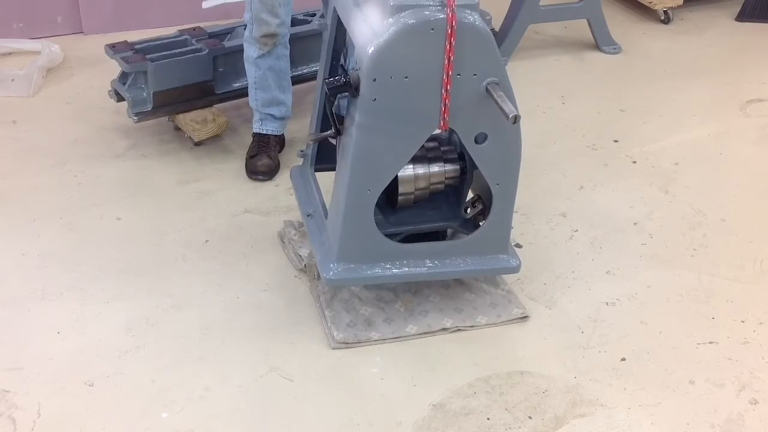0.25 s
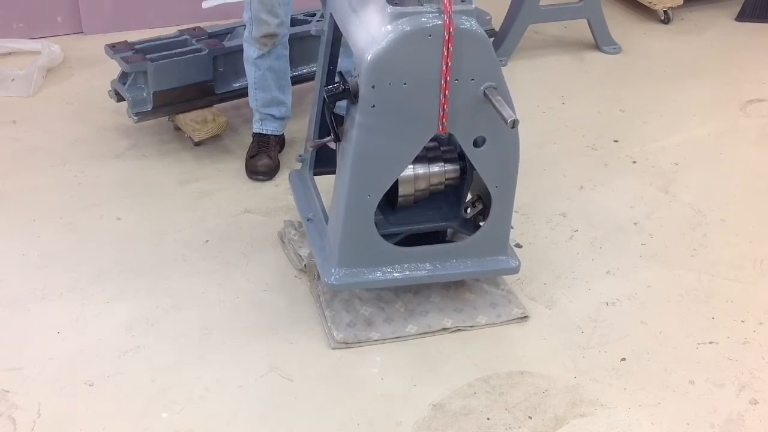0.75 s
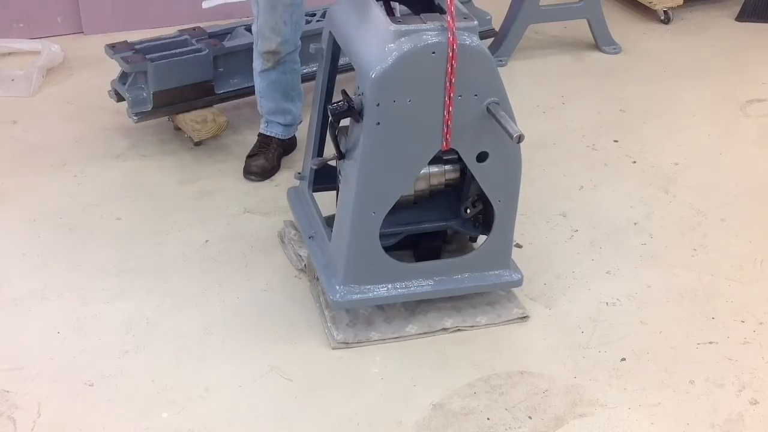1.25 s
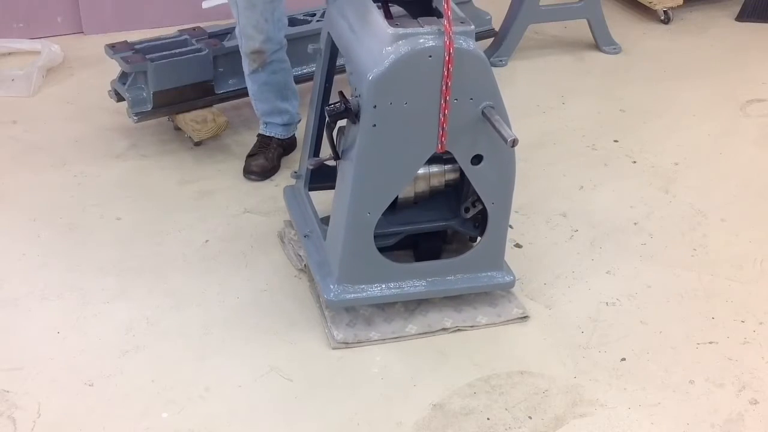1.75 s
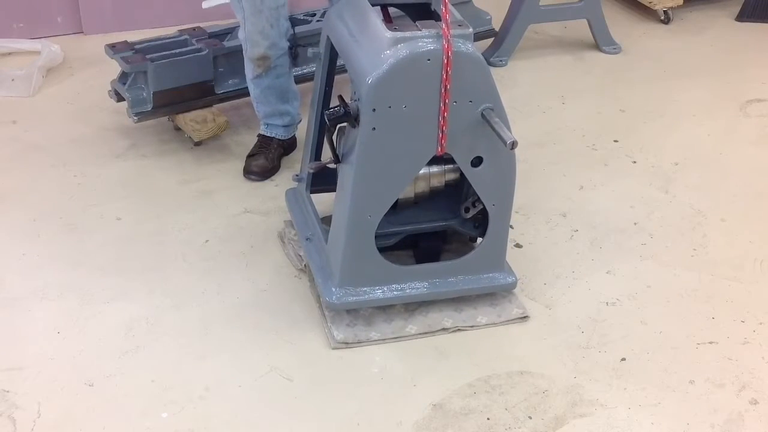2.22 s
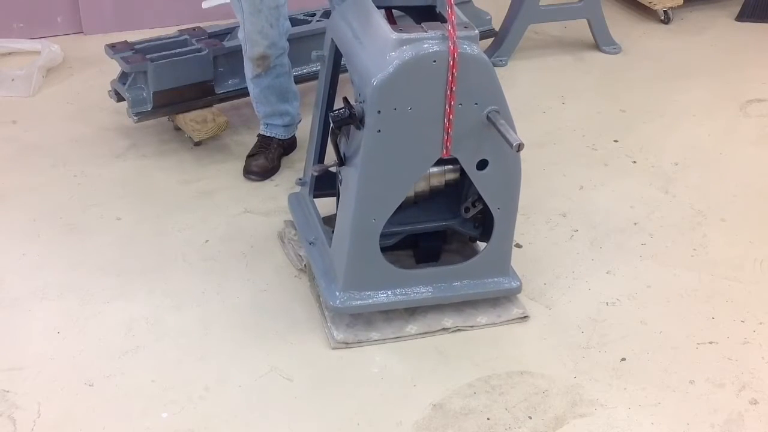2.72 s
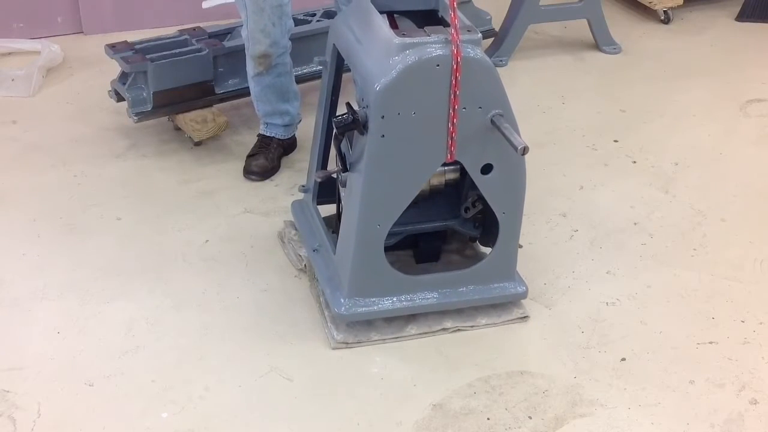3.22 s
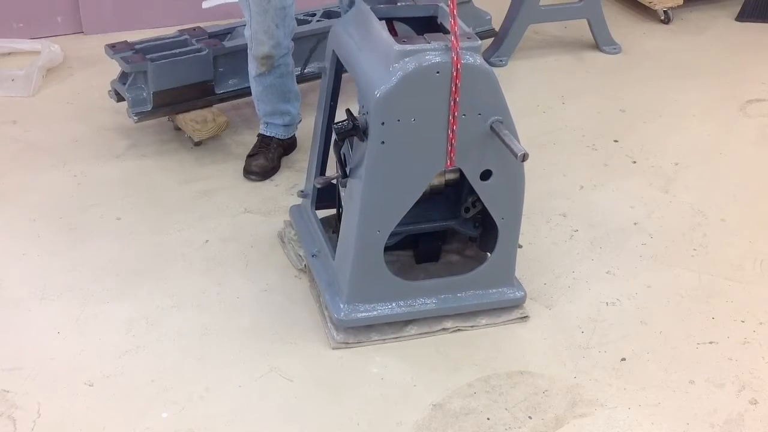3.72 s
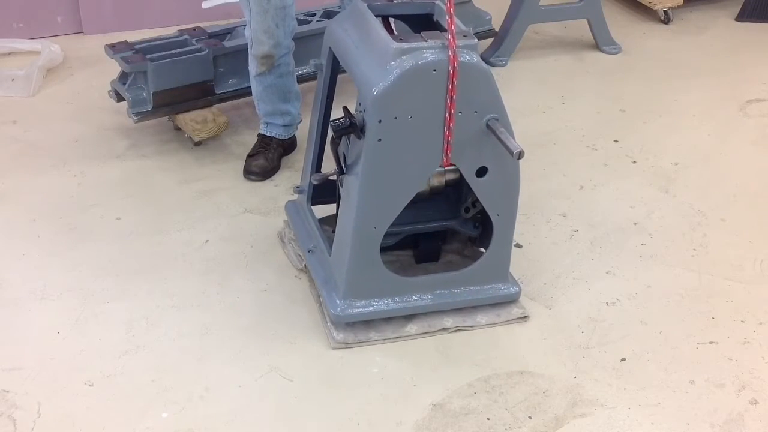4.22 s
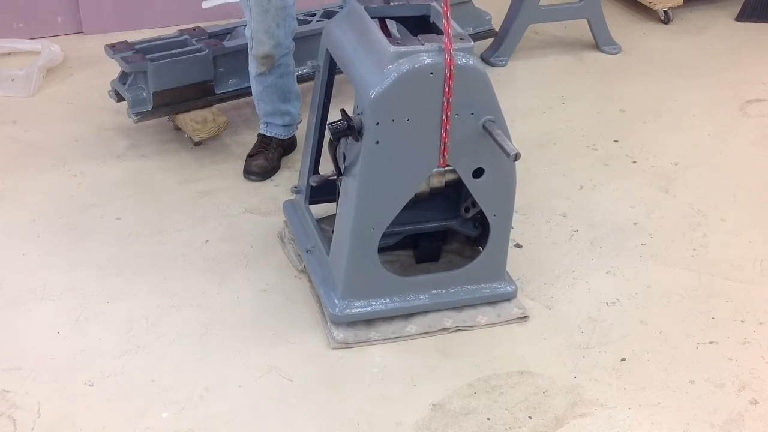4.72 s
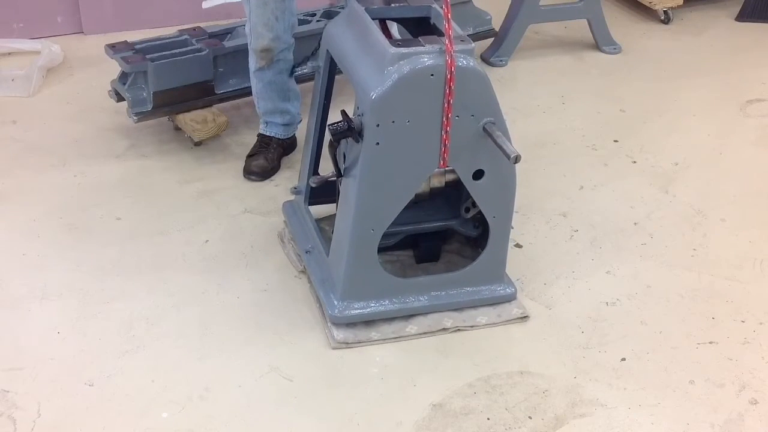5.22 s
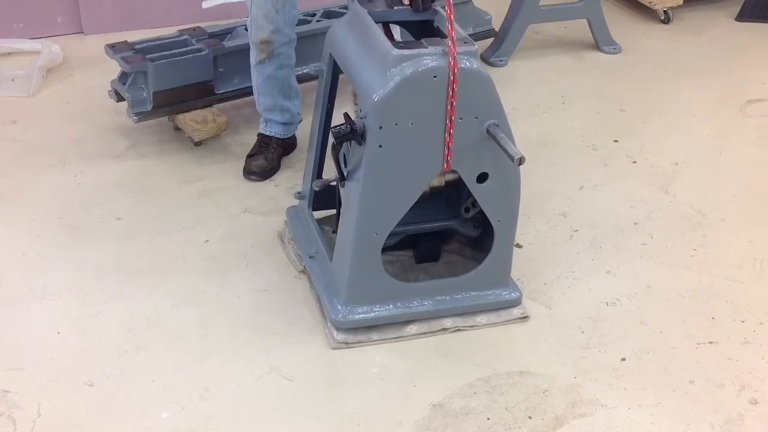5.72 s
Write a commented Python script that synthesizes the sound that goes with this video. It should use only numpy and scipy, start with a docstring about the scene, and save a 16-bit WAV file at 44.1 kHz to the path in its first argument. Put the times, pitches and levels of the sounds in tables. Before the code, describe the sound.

A fading low hum and small bright chain ticks open over quiet workshop air. At about 0.17 s the first haul swells into a loud, dense clatter of steel links, with a hollow wheel tone near 950 Hz, and lets go around 0.75 s. Its echo fades, then the level dips abruptly to near silence at 1.1-1.28 s. Jerks start the second haul at 1.3 s; a heavy clang strikes at 1.8 s, and clonks slow down until 2.25 s while steel rings on. Slack chain swishes and ticks at 2.15-2.9 s. The third haul rattles from 3.04 to 3.75 s, ending in a clonk and echo, with a light ping at 4.17 s. Strong jerks open the fourth, slightly duller haul at 4.3 s; another clang hits at 4.74 s, then a clonk at 4.87 s. Ringing decays under faint slack-chain hiss, scattered ticks and a high ping near 5.6 s, to 6 s.

```python
"""A fading low hum and the first ticks of a slack chain are heard, then four hauls on a hand chain hoist
that lowers a cast-iron machine frame in a hard-walled workshop. Each haul is a dense random series of
steel link contacts that excites the resonances of the hand wheel and its housing. Near the end of two
hauls a heavy clang sets steel modes ringing, and diffuse echo draws out the metal sounds."""
import sys
import numpy as np
from scipy import signal
from scipy.fft import rfft, irfft, next_fast_len
from scipy.io import wavfile
from scipy.ndimage import map_coordinates

SR = 44100
rng = np.random.default_rng(int(sys.argv[2]) if len(sys.argv) > 2 else 0)


def digitize_waveform(pressure):
    """Quantize a signal to 16-bit integers and store it at the path in sys.argv[1].

    Rows of a 2-D input are taken as channels; values are limited to [-1, 1].
    """
    field = np.atleast_2d(pressure).T
    bounded = np.clip(field, -1, 1)
    quanta = np.round(bounded * 32767).astype(np.int16)
    wavfile.write(sys.argv[1], SR, quanta)


N = 262835

# clangs as the loaded chain settles: t/s, level/dB before the crash and ring offsets, hum level/dB
CLANG_EVENTS = [(1.801, -16, -39), (2.493, -44, -80), (4.736, -15, -40.5)]
TOP_HZ = 15350  # upper limit of the sound's band


def amp(db):
    """Level to amplitude: 20 dB is a factor of ten."""
    return 10 ** (np.asarray(db) / 20)


def unit(x):
    """Normalization to rms 1, so that levels can be set afterwards."""
    return x / np.sqrt(np.mean(x ** 2) + 1e-20)


def along(points, hz):
    """Spectral interpolation of (f/Hz, value) points on a logarithmic frequency axis."""
    f, value = np.transpose(points)
    return np.interp(np.log(hz + 1), np.log(f + 1), value)


def add(track, s, sound):
    """Superposition: mix a sound into a track from time s."""
    start = max(0, round(s * SR))
    track[start:start + len(sound)] += sound[:N - start]


def filtered(x, gain):
    """Zero-phase filtering: each frequency is weighted by a real gain."""
    size = next_fast_len(N + SR // 2)
    return irfft(rfft(x, size) * gain(np.fft.rfftfreq(size, 1 / SR)), size)[:N]


def struck(x, gain, size=32768):
    """Causality by minimum phase: a body rings only after it is hit."""
    log_gain = np.log(np.maximum(gain(np.fft.rfftfreq(size, 1 / SR)), 1e-6))
    cepstrum = irfft(log_gain)
    # folding the cepstrum onto positive time gives the minimum phase
    cepstrum[1:size // 2] *= 2
    cepstrum[size // 2 + 1:] = 0
    impulse_response = irfft(np.exp(rfft(cepstrum)))
    return signal.fftconvolve(x, impulse_response)[:N]


def burst(t60):
    """Exponentially decaying noise: a cluster of contacts with the energy of 10 ms at rms 1."""
    t = np.arange(SR // 2) / SR
    noise = rng.standard_normal(len(t)) * amp(-60 * t / t60)
    return noise / np.linalg.norm(noise) * np.sqrt(SR / 10 / 10)


def hall(x, direct_db, count=6):
    """Diffuse reverberation, decaying fastest in the treble; the moving chain changes its echo path."""
    # the workshop's echo: f/Hz, t60/s
    decay_times = [(100, 0.56), (500, 1.11), (1500, 1.17), (3000, 0.85), (5000, 0.67), (8000, 0.43),
                   (14000, 0.23)]
    hz, t, noise = signal.stft(rng.standard_normal((count, 3 * SR // 2)), SR, nperseg=256)
    t60 = along(decay_times, hz)[:, None]
    tails = signal.istft(noise * amp(-60 * t / t60) / np.sqrt(t60), SR, nperseg=256)[1]
    tails /= np.linalg.norm(tails[0])
    # every 256 samples the sound passes to the next tail in turn
    path = np.arange(N) // 256 % count == np.arange(count)[:, None]
    wet = signal.fftconvolve(x * path, tails, axes=1)[:, :N].sum(0)
    return (amp(direct_db) * x + wet) / np.hypot(1, amp(direct_db))


def links(rattle_db, most_per_s, scatter_db, ring_t60, ring_db, count=4000):
    """Shot noise of steady power: contacts crowd at high level, each a click and a ring of its own pitch."""
    chance, size, pitch, luck = rng.random((count, 4)).T
    at = (chance * N).astype(int)
    rate = most_per_s * amp((rattle_db[at] - rattle_db.max()) / 4)
    kept = luck < rate * N / SR / count
    # fewer contacts are larger ones, which holds the power steady
    size = amp(scatter_db * size) / np.sqrt(rate) * kept
    t = np.arange(SR // 50) / SR
    tones = np.sin(2 * np.pi * TOP_HZ * np.sqrt(pitch)[:, None] * t)
    rings = size[:, None] * tones * amp(-60 * t / ring_t60)
    jingle = np.bincount((at[:, None] + np.arange(len(t))).ravel(), rings.ravel(), N)[:N]
    clicks = np.bincount(at, size * rng.choice([-1, 1], count), N)
    return unit(unit(clicks) + amp(ring_db) * unit(jingle))


def still_air(level_db):
    """Stationary noise: the quiet workshop air has a fixed broad spectrum."""
    # still workshop air: f/Hz, relative level/dB
    air_colour = [(25, -32), (55, -15), (120, 0.5), (250, 1.5), (600, 3), (1500, -1), (4000, -6.5),
                  (9000, -11), (15000, -11.5)]
    noise = rng.standard_normal(N)
    return amp(level_db) * unit(filtered(noise, lambda hz: amp(along(air_colour, hz))))


def low_ring(hz, t60, start_db, under_hz, under_db):
    """Lightly damped modes: the two deepest hum after each clang, the upper one also from the start."""
    out, t = np.zeros(N), np.arange(2 * SR) / SR
    envelope = amp(-60 * t / t60) * (1 - np.exp(-t / 0.0013))
    upper = envelope * np.sin(2 * np.pi * hz * t)
    under = envelope * np.sin(2 * np.pi * under_hz * t)
    add(out, 0, amp(start_db) * upper)
    for s, _, db in CLANG_EVENTS:
        add(out, s, amp(db) * (upper + amp(under_db) * under))
    return out


def sways():
    """Power summation of swings that rise, hold and fade: levels/dB of the slide and the hoist's shake."""
    # swings of the slack loop: start t/s, length/s, sliding level/dB, shake of the hoist/dB
    swings = [(0, 0.2, -62, -45), (2.158, .3, -47.5, -55), (2.487, 0.18, -47, -47),
              (2.759, 0.71, -70, -57.5), (4.167, .14, -62, -50.5), (5.033, 0.28, -49, -51.5),
              (5.923, 0.046, -44, -68)]
    rise_s, fade_db_per_s = 0.0062, 170
    rest_db = -75  # the hanging chain never quite stops
    t = np.arange(N) / SR
    sliding = shake = np.full(N, amp(rest_db))
    for s, length, slide_db, shake_db in swings:
        rise = np.clip((t - s) / rise_s, 0, 1)
        swing = rise * amp(-fade_db_per_s * np.maximum(t - s - length, 0))
        sliding = np.hypot(sliding, amp(slide_db) * swing)
        shake = np.hypot(shake, amp(shake_db) * swing)
    return 20 * np.log10(sliding), 20 * np.log10(shake)


def slack(tick_t60):
    """Friction and impact without load: links slide and tick but do not ring the housing."""
    # bright ticks of the slack loop: t/s, level/dB over 10 ms before filter and echo
    tick_events = [(0.102, -42), (2.476, -34.5), (2.535, -35.5), (2.826, -39.5), (4.172, -40), (5.166, -47),
                   (5.252, -37), (5.39, -44.5), (5.489, -47), (5.617, -42.5), (5.91, -39.5)]
    # the slack sounds as heard, a smooth bright hiss rising towards 15 kHz: f/Hz, relative level/dB
    heard_spectrum = [(100, -24), (400, 0), (2500, -3.5), (8000, -1.5), (13000, 0.5), (14300, 5),
                      (15100, 8.5)]
    level_db = sways()[0]
    sliding = links(level_db, most_per_s=540, scatter_db=18, ring_t60=.004, ring_db=-8)
    contacts = amp(level_db) * sliding
    for s, db in tick_events:
        add(contacts, s, amp(db) * burst(tick_t60))

    def hiss_gain(hz):
        return unit(amp(along(heard_spectrum, hz)) * np.where(hz < TOP_HZ + 500, 1, .1))

    return struck(hall(contacts, direct_db=-10), hiss_gain)


def effort():
    """Power summation of hauls that run up, hold and coast: rattle, treble lift and wheel song in dB."""
    # hauls: start t/s, run-up time constant/s, let-go t/s, level/dB,
    # treble lift/dB, song of the wheel/dB relative to the level
    hauls = [(0.167, 0.14, 0.74, -13.5, -0.5, -8), (1.329, 0.14, 1.96, -13.5, 0, -8.5),
             (3.041, 0.13, 3.727, -13.5, -1, -10), (4.311, 0.065, 4.833, -15, -2, -9.5)]
    ease_s, coast_db_per_s = .05, 136.5  # the hand eases off around the let-go, then the wheel runs down
    dulling = 0.24  # dB of treble lost for each dB that the chain slows
    song_fade = 0.91  # the wheel's song sinks more slowly than the rattle
    idle_lift_db, idle_song_db = -6.5, -3.5  # while the chain only sways
    t = np.arange(N) / SR
    power = (amp(sways()[1]) * amp([[0], [idle_lift_db], [idle_song_db]])) ** 2
    for start, run_up, let_go, db, lift_db, song_db in hauls:
        speed = 1 - np.exp(-np.maximum(t - start, 0) / run_up)
        coast_db = -coast_db_per_s * ease_s * np.logaddexp(0, (t - let_go) / ease_s)
        treble_db = lift_db + (1 + dulling) * coast_db
        wheel_db = song_db + song_fade * coast_db
        power += (speed * amp(db + np.array([coast_db, treble_db, wheel_db]))) ** 2
    rattle_db, treble_db, song_db = 10 * np.log10(power)
    return rattle_db, treble_db - rattle_db, song_db


def housing(hz):
    """Resonance: narrow peaks of housing and links stand on the chain's broad spectrum."""
    # colour of steel links on the wheel: f/Hz, relative level/dB
    chain_colour = [(35, -56), (58, -59), (80, -27.5), (170, -30.5), (330, -22.5), (520, -19), (800, -14.5),
                    (1300, -15.5), (1900, -13), (3200, -17), (5100, -14), (6500, -20), (9000, -20),
                    (13500, -22.5), (15000, -21)]
    # resonances of housing and links: f/Hz, width/Hz, lift/dB
    resonances = [(120, 15, 8.5), (208.8, 10.6, 14), (253.4, 19.5, 11), (452, 38, 11), (551.6, 25, 11.5),
                  (628, 15, 13.5), (700, 7.8, 11.5), (1165, 5.5, 9), (1695, 5.7, 10.5), (1730, 13, 7),
                  (1954, 85, 3.5), (2466, 23, 12), (2680, 107, 7.5), (2936, 44, 8.5), (3605, 106, 9.5),
                  (4205, 18, 9.5), (4550, 58, 5), (4890, 22, 10), (5300, 114, 7), (5930, 12, 13),
                  (6070, 43, 10), (6450, 26, 8.5), (7250, 42, 8), (7460, 400, 5), (8950, 26, 10.5),
                  (9551, 20, 10.5), (10680, 45, 8), (11430, 230, 5.5)]
    peaks = 0
    for centre, width, db in resonances:
        peaks = peaks + (amp(db) ** 2 - 1) / (1 + (2 * (hz - centre) / width) ** 2)
    band = np.where(hz < TOP_HZ + 1000, 1, .1)
    return unit(amp(along(chain_colour, hz)) * np.sqrt(np.abs(1 + peaks)) * band)


def hoist(rattle_db, lift_db, jerk_t60, split_hz, direct_db):
    """Forced vibration: running links and jerks shake the housing, each with its own treble balance."""
    # jerks as the chain is taken up: t/s, level/dB over 10 ms before colour and echo, treble lift/dB
    jerk_events = [(.175, -23, -8), (.247, -20.5, 6), (1.2847, -23, -2.5), (1.348, -25.5, 5),
                   (1.433, -13, -3), (3.031, -28, -2), (3.118, -29, 4.5), (4.259, -30, -5.5),
                   (4.313, -14, 0), (4.493, -11.5, -4)]
    body = amp(rattle_db) * links(rattle_db, most_per_s=600, scatter_db=11.5, ring_t60=0.02, ring_db=-2.5)
    treble = body * amp(lift_db)
    for s, db, lift in jerk_events:
        jerk = amp(db) * burst(jerk_t60)
        add(body, s, jerk)
        add(treble, s, jerk * amp(lift))

    def low(hz):
        return housing(hz) / np.hypot(1, (hz / split_hz) ** 3)

    def high(hz):
        return low(hz) * (hz / split_hz) ** 3

    return struck(hall(body, direct_db), low) + struck(hall(treble, direct_db), high)


def wheel(song_db, knock_hz, knock_t60, pockets_per_s, count=260):
    """Modal excitation: links dropping into the pockets make the wheel sing; some land with a clonk."""
    # links that land hard: t/s, starting level/dB of the decay
    knock_events = [(.005, -39.5), (.174, -33), (.247, -23), (.301, -27), (.346, -24), (.495, -15.5),
                    (1.347, -28), (1.38, -24.5), (1.951, -15), (2.039, -17), (2.146, -19.5), (2.244, -25),
                    (2.59, -38), (2.692, -38.5), (3.07, -35), (3.19, -30), (3.79, -16), (4.874, -18)]
    # modes of the hand wheel: f/Hz, half-width at half amplitude/Hz, relative level/dB
    wheel_modes = [(880, 15, -8.5), (926.4, 10.2, -3), (954.3, 9, -1.5), (994.3, 7.7, -8)]
    size_scatter_db, timing_jitter = 2, .25
    gap, size = rng.standard_normal((count, 2)).T
    at = np.cumsum(np.exp(timing_jitter * gap) * SR / pockets_per_s).astype(int)
    drops = unit(np.bincount(at, amp(size_scatter_db * size), N)[:N])
    contacts = amp(song_db) * drops

    def modes(hz):
        return unit(sum(amp(db) / (1 + ((hz - centre) / width) ** 2) for centre, width, db in wheel_modes))

    knocks, t = np.zeros(N), np.arange(SR // 2) / SR
    clonk = (1 - np.exp(-t / 0.00071)) * np.sin(2 * np.pi * knock_hz * t)
    for s, db in knock_events:
        add(knocks, s, amp(db - 60 * t / knock_t60) * clonk)
    return knocks + struck(hall(contacts, direct_db=-2.5), modes)


def pings(t60, direct_db):
    """Free vibration: a loose link sings briefly at one high pitch."""
    # links that ping: t/s, starting level/dB of the decay before echo, f/Hz
    ping_events = [(.102, -34, 11600), (4.172, -35, 11800), (5.634, -30, 11620)]
    out, t = np.zeros(N), np.arange(SR // 4) / SR
    for s, db, hz in ping_events:
        envelope = amp(db - 60 * t / t60) * (1 - np.exp(-t / 0.0018))
        add(out, s, envelope * np.sin(2 * np.pi * hz * t))
    return hall(out, direct_db, count=1)


def waver(rate, count=200):
    """Random modulation, complex and about rms 1: a ring swells and fades among the walls."""
    at = np.arange(2 * SR) * rate / SR
    re, im = (map_coordinates(knots, [at], mode='wrap') for knots in rng.standard_normal((2, count)))
    return (re + 1j * im) / np.sqrt(2)


def clangs(crash_db, crash_t60, ring_db, damping):
    """Impact excitation: a broad crash, then the steel's modes ring on, blurred by the hall."""
    # modes of the loaded steel: f/Hz, relative level/dB, t60/s before division by damping
    steel_modes = [(542, -14, 1), (1163, -1, 1.35), (1370, -4, 1.4), (1513, 3.5, 1.3), (1683, 8, 0.65),
                   (1957, 6, 0.98), (2110, 3.5, 1.0), (2230, -7, 0.51), (2390, 5, 0.78), (2963, 1, 0.98),
                   (3400, -3, 0.66), (3370, -14, 1.2), (3650, -11, 0.92), (4700, -21, .7), (5380, -10, 0.7),
                   (5400, -16, 0.74), (6100, -19, 0.61)]
    # colour of the crash: f/Hz, relative level/dB
    crash_colour = [(60, -41), (300, -41.5), (800, 0), (1400, 5), (2800, 5.5), (5000, -0.5), (8000, -5.5),
                    (15000, -16.5)]
    crashes, rings, t = np.zeros(N), np.zeros(N), np.arange(2 * SR) / SR
    for s, db, _ in CLANG_EVENTS:
        add(crashes, s, amp(db + crash_db) * burst(crash_t60))
        for hz, level, t60 in steel_modes:
            fade = amp(db + ring_db + level - 60 * damping * t / t60) * (1 - np.exp(-t / 0.038))
            blur = 0.86 + 1.35 * waver(rate=28.4)  # steady part plus random part
            add(rings, s, fade * np.real(blur * np.exp(2j * np.pi * hz * t)))
    crash = struck(hall(crashes, direct_db=-3.5), lambda hz: unit(amp(along(crash_colour, hz))))
    return crash + rings


def level_dip():
    """Amplitude modulation: the level dips briefly after the first haul; gains for hoist and air."""
    # course of the dip: t/s, hoist gain/dB, air gain/dB
    dip_points = [(1.085, 0, 0), (1.106, -6, 0), (1.116, -45, -22), (1.145, -45, 0), (1.278, -40, 0),
                  (1.285, 0, 0)]
    s, hoist_db, air_db = np.transpose(dip_points)
    t = np.arange(N) / SR
    return amp(np.interp(t, s, hoist_db)), amp(np.interp(t, s, air_db))


def scene():
    """Superposition of hoist, slack chain and ringing steel over the still air of the workshop."""
    hoist_gain, air_gain = level_dip()
    air = still_air(level_db=-58.0)
    hum = low_ring(hz=260, t60=2.24, start_db=-43.5, under_hz=202.6, under_db=-11.5)
    loose = slack(tick_t60=0.045) + pings(t60=0.034, direct_db=-6)
    rattle_db, lift_db, song_db = effort()
    chain = hoist(rattle_db, lift_db, jerk_t60=0.12, split_hz=4600, direct_db=-7.5)
    chain += wheel(song_db, knock_hz=953, knock_t60=0.18, pockets_per_s=29)
    steel = clangs(crash_db=10.5, crash_t60=0.2, ring_db=-12.5, damping=1.03)
    return hoist_gain * (chain + loose + steel + hum) + air_gain * air


def record(dry):
    """Saturation and band limit: the microphone rounds off the highest peaks and cuts steeply at TOP_HZ."""
    rounded = dry / (1 + (dry / .92) ** 8) ** (1 / 8)
    return filtered(rounded, lambda hz: 1 / (1 + (hz / TOP_HZ) ** 400))


dry = scene()
out = record(dry)
digitize_waveform(out)
```